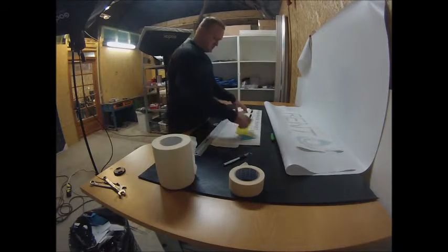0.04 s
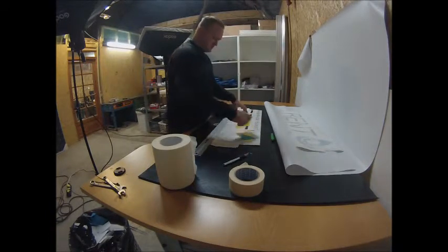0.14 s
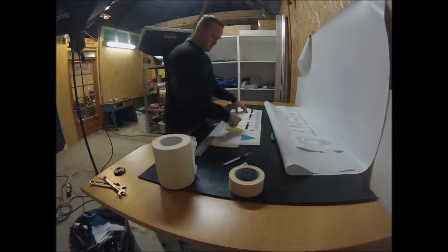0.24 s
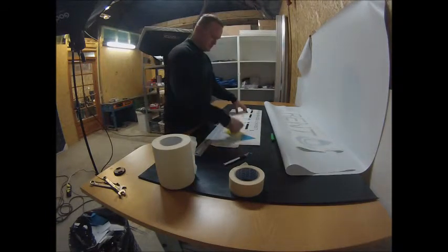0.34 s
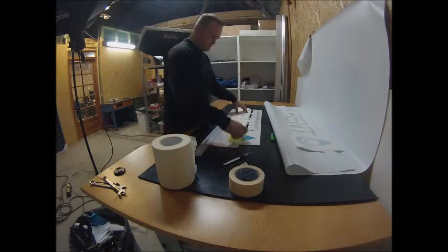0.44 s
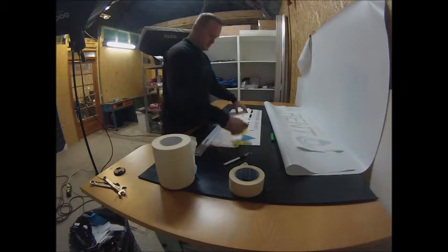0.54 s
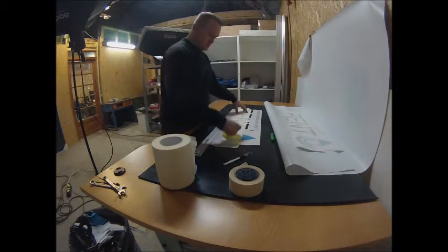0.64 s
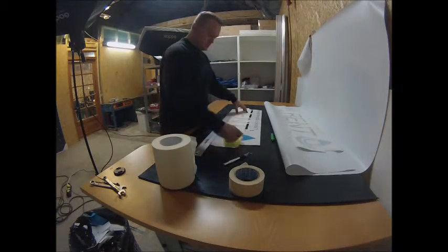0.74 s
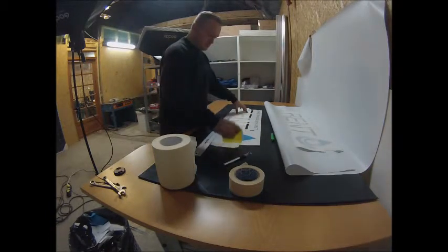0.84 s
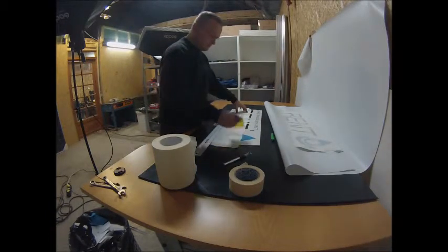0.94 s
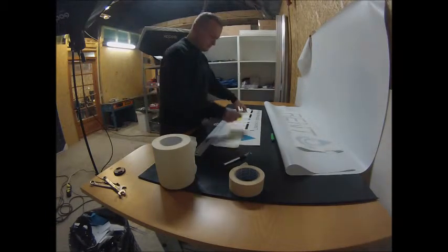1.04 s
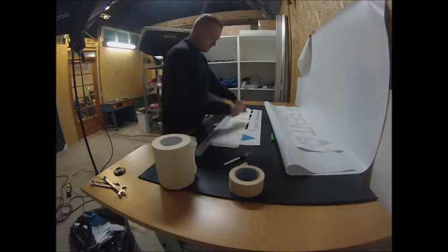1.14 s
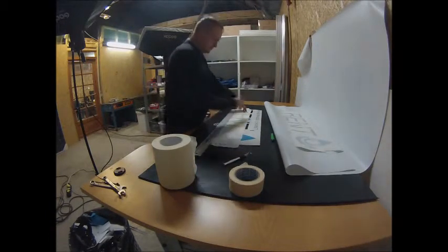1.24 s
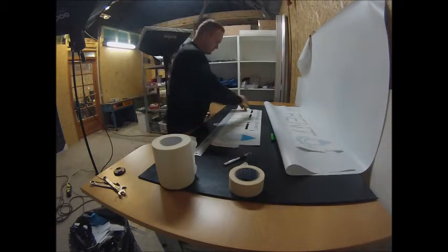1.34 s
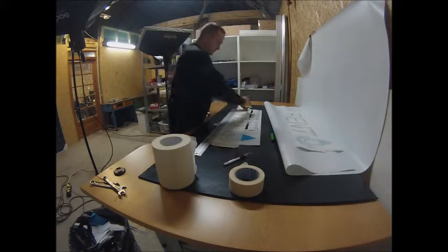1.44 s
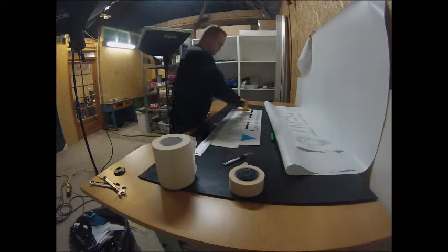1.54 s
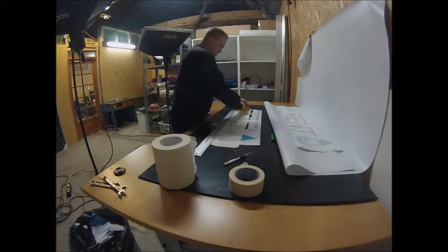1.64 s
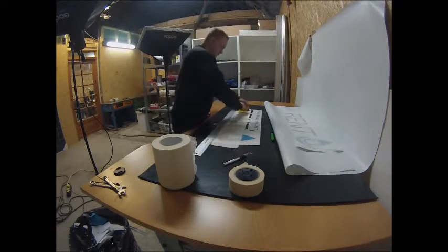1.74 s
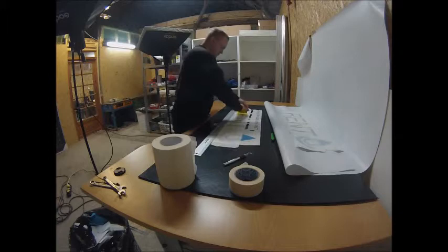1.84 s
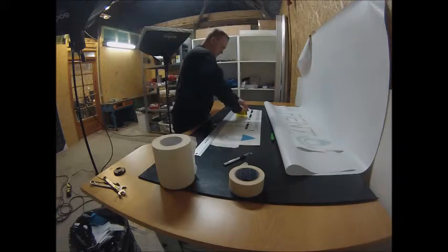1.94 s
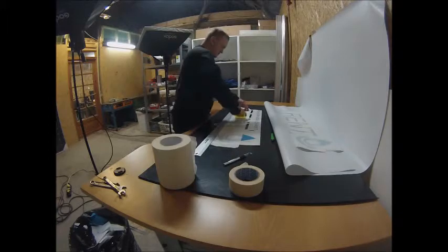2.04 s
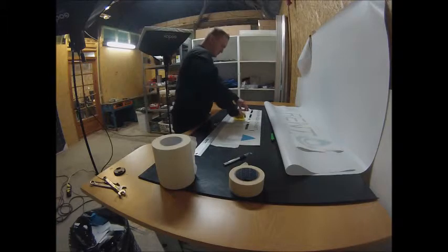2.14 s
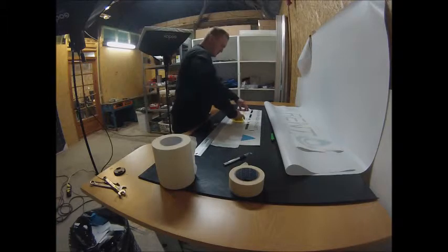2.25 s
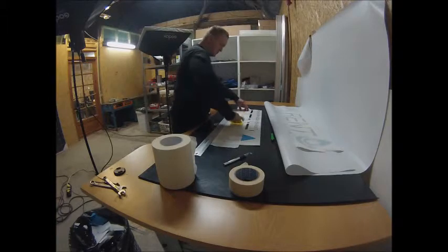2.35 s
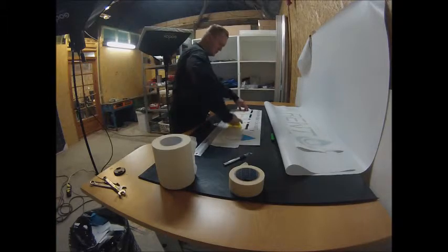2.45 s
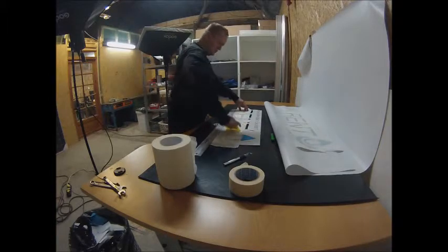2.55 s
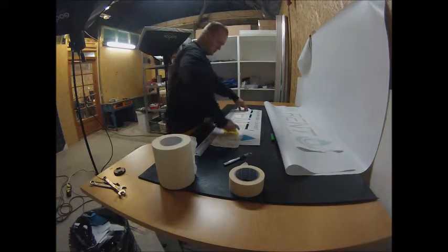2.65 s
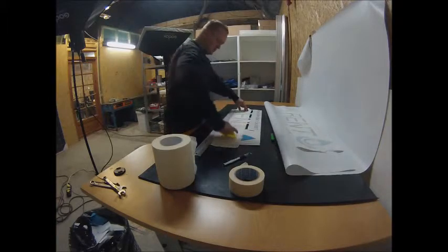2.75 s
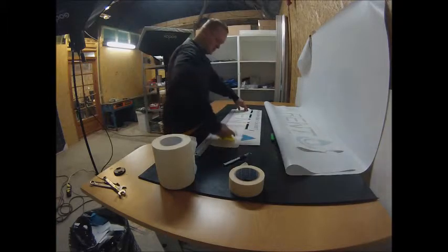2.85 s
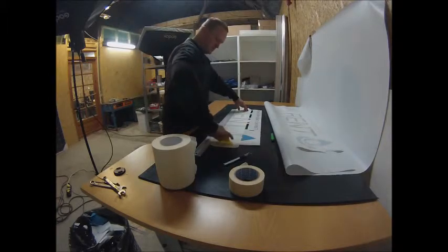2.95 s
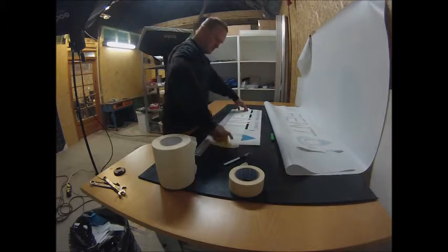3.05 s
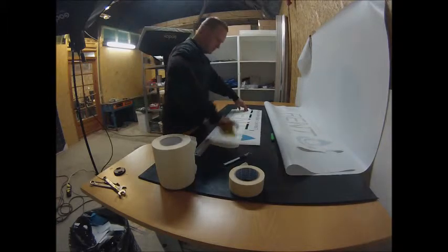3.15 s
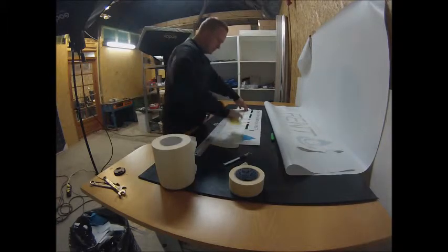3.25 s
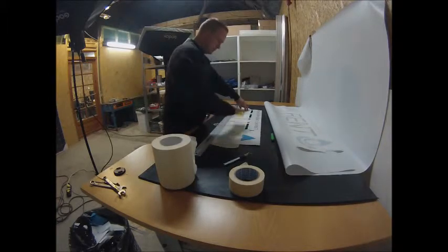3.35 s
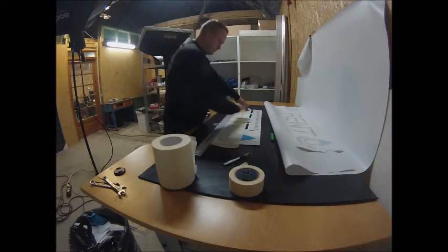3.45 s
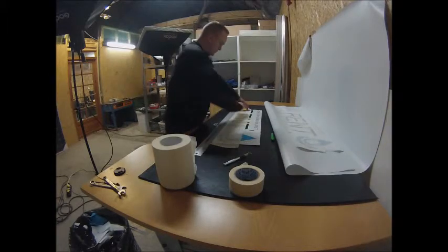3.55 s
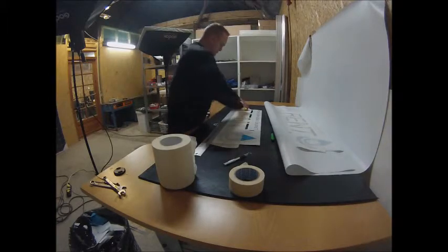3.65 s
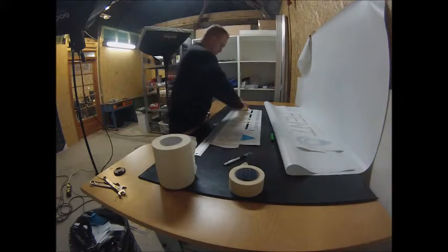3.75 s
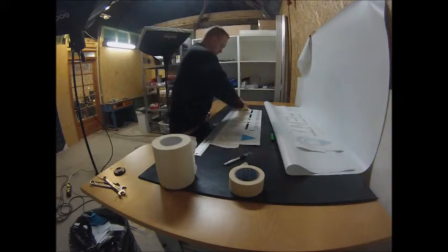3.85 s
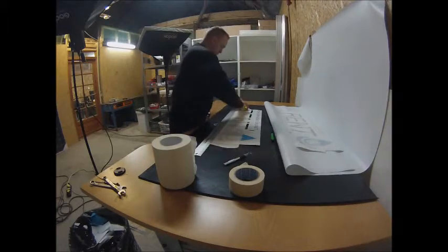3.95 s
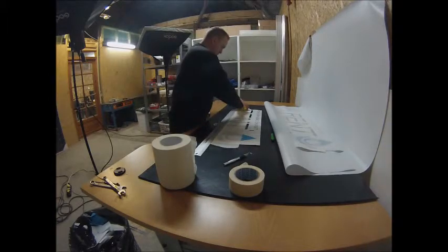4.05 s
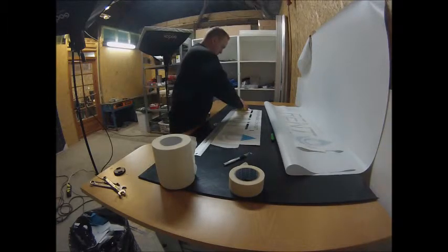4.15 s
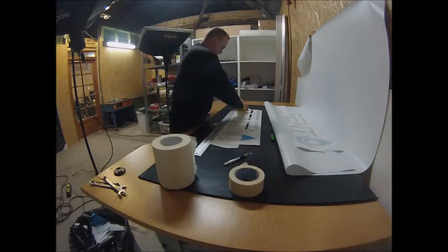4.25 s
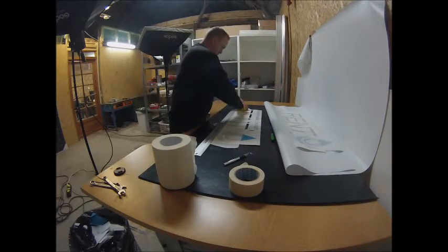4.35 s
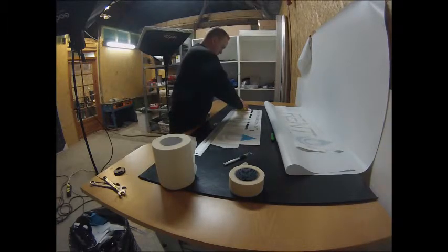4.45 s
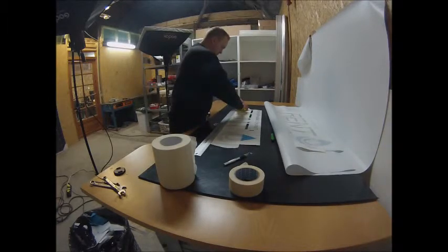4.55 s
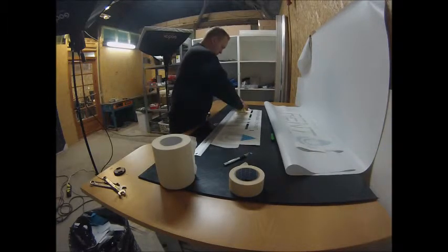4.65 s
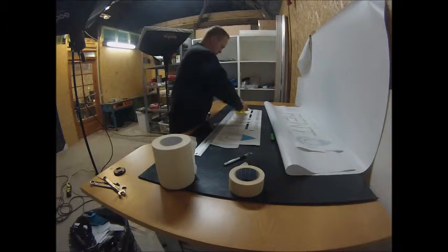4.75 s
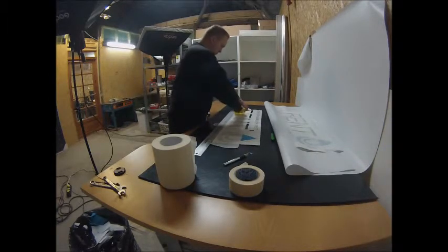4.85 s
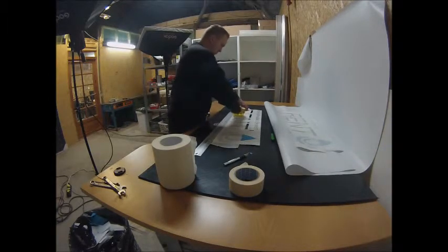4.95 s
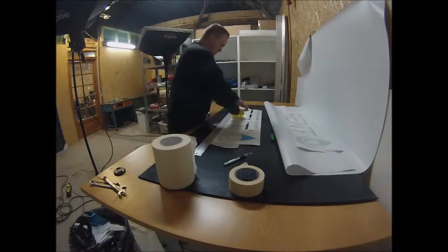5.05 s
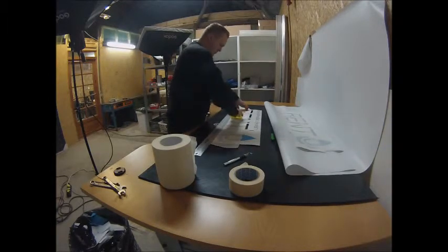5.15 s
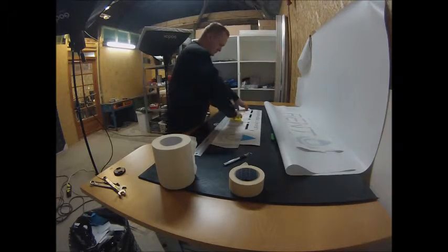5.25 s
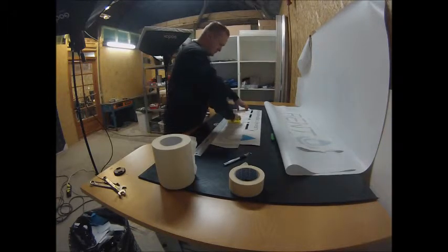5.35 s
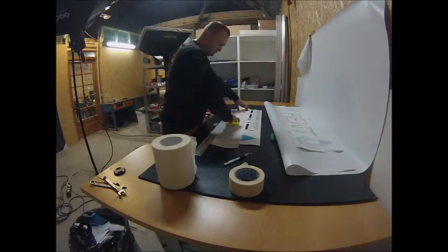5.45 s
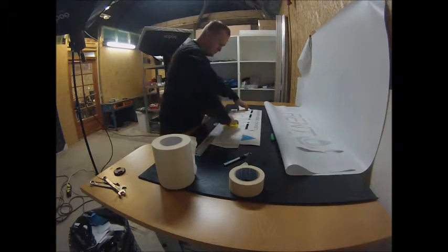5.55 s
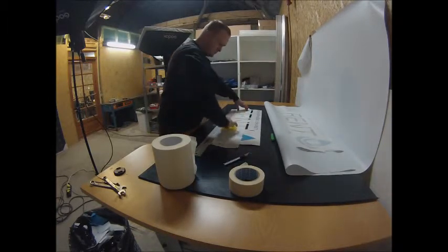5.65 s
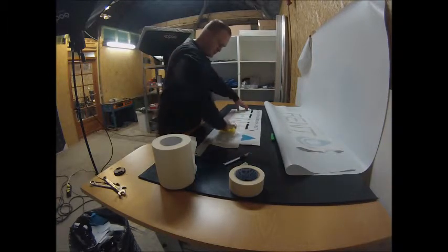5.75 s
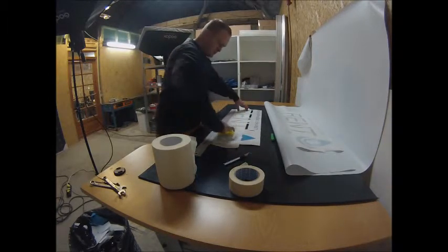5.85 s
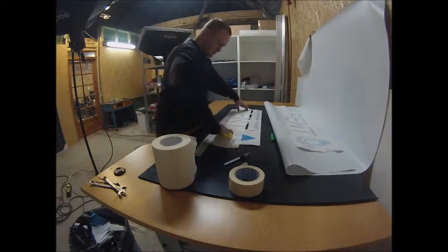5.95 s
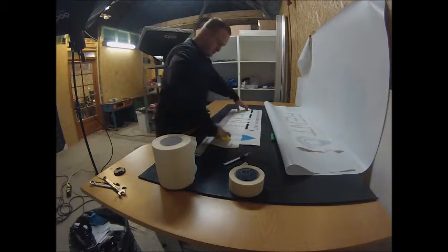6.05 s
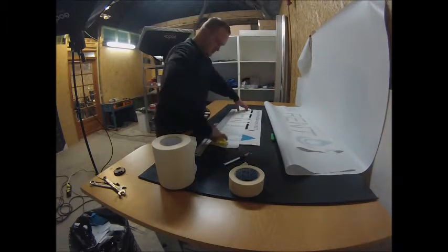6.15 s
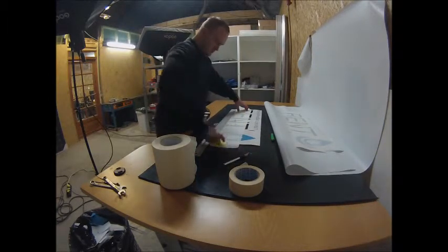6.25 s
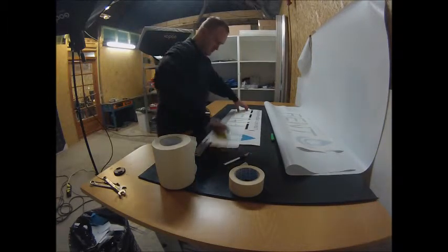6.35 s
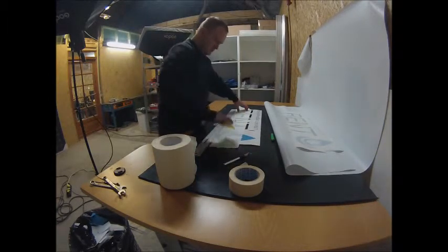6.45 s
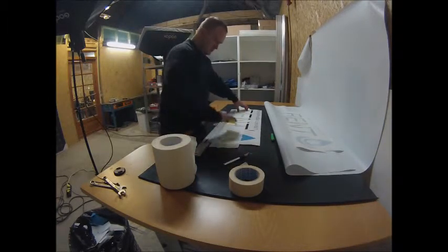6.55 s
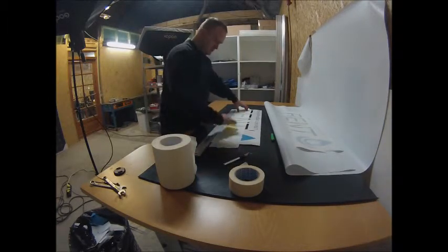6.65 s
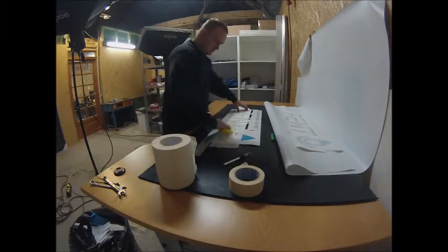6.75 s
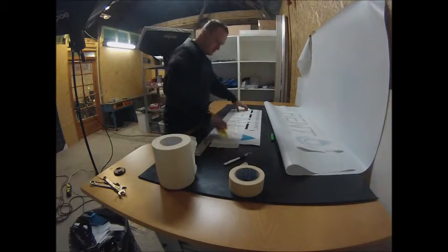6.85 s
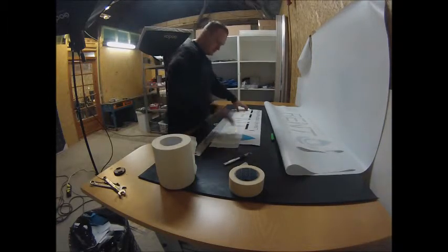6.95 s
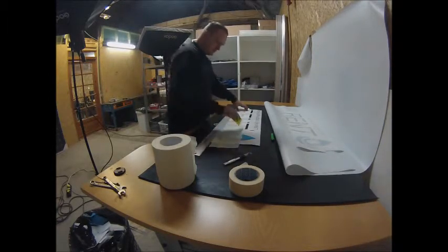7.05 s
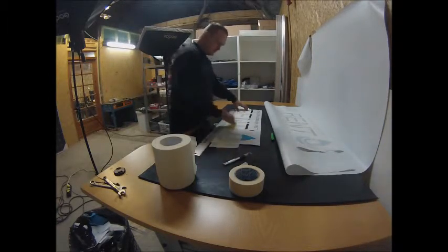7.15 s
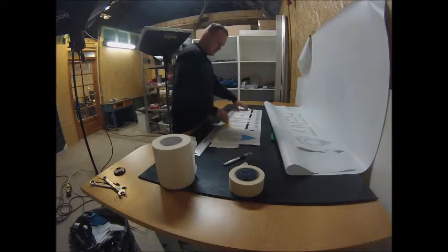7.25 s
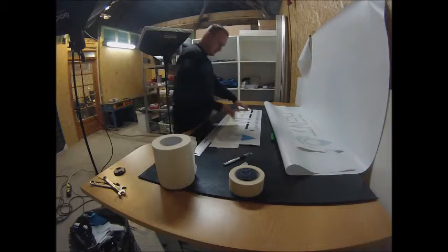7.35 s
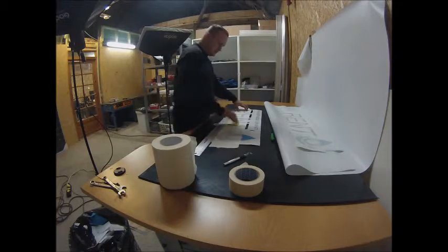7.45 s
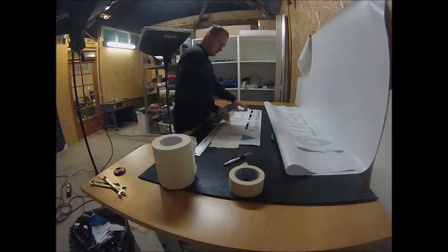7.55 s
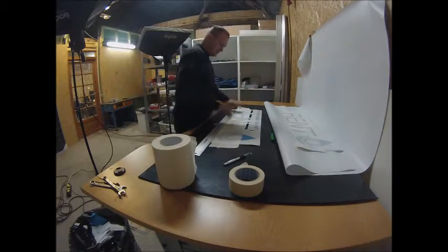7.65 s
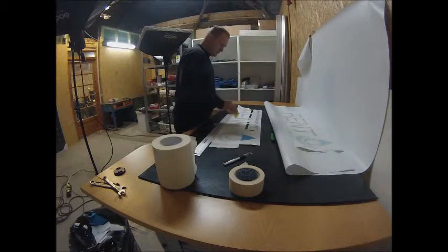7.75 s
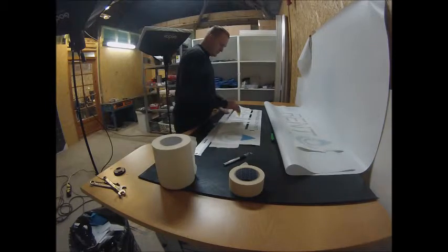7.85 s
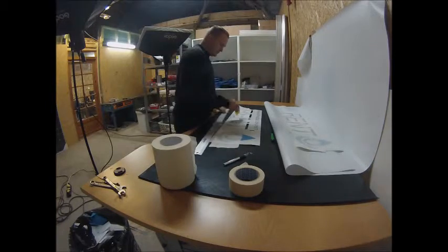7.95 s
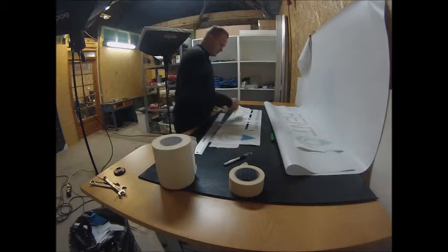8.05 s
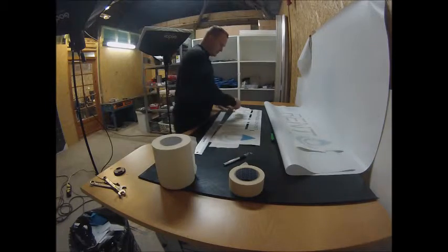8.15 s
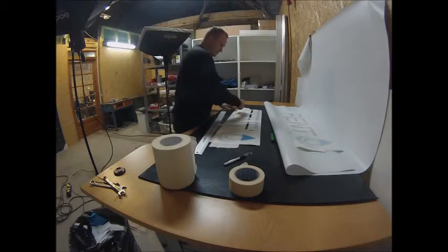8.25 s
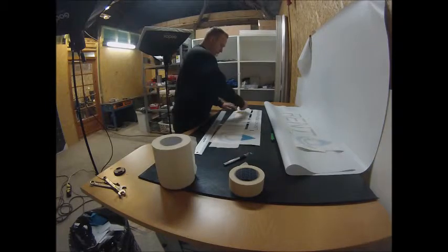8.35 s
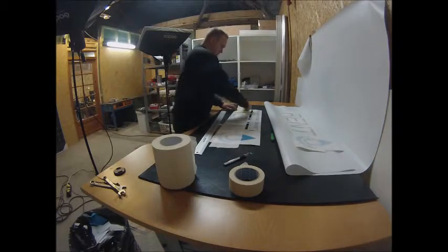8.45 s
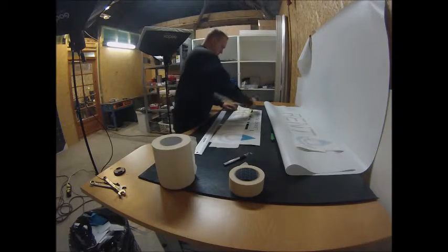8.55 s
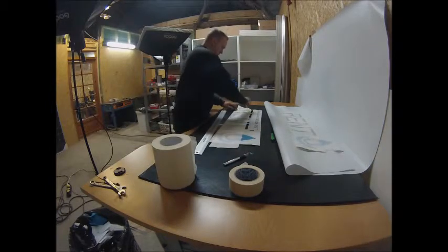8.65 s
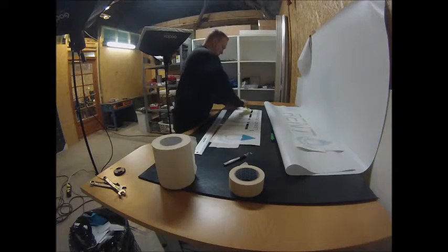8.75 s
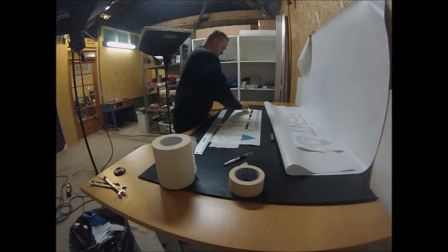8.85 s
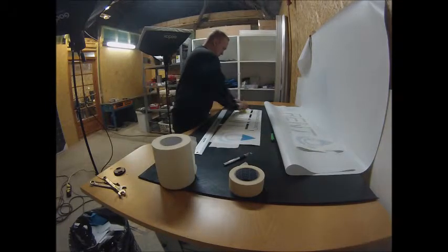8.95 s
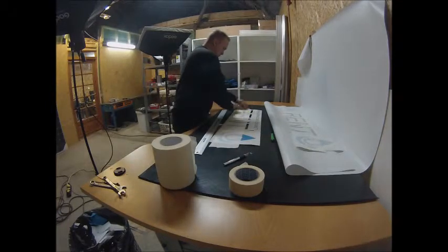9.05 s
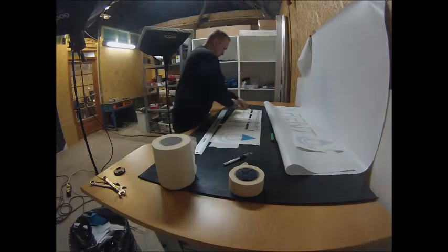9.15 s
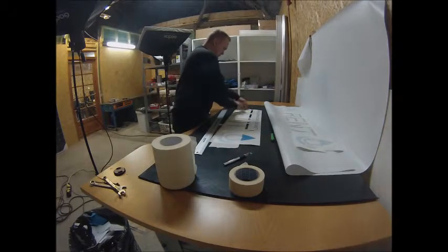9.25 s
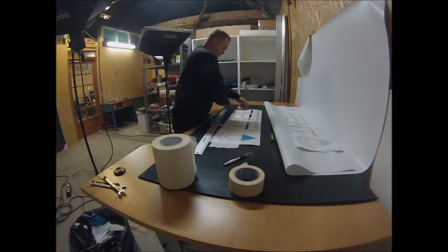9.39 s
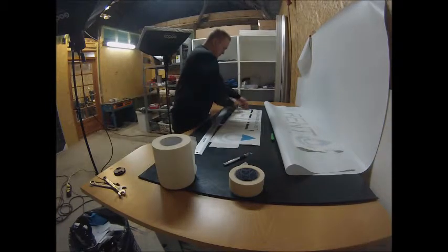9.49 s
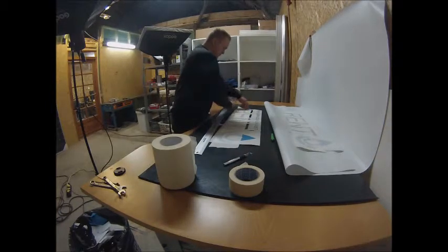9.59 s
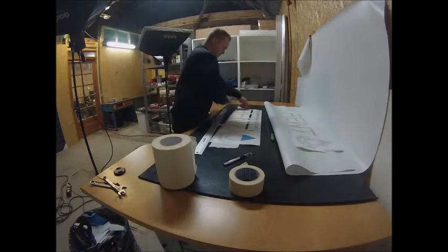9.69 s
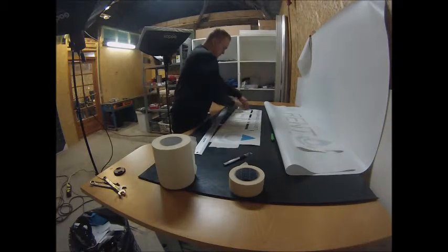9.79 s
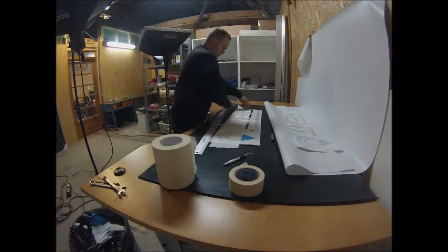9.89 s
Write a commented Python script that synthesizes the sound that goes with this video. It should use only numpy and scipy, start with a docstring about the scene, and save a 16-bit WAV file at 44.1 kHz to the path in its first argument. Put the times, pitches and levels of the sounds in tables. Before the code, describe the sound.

Quick swishing scrapes and longer, duller rubs of a squeegee on vinyl sheet, with small taps and clicks over faint ventilation hum.

```python
"""Quick scraping strokes sweep over vinyl: a plastic squeegee on a workbench in a small workshop.
Stick-slip friction excites bench, sheet and blade, brightly in the sweeps and duller in two slow pushes.
The blade taps down, snags on the sheet's edges and judders; the bench thumps when leaned on.
The blade's sounds reverberate in the room, over a faint hum of ventilation, all at one microphone."""
import sys
import numpy as np
from scipy import signal
from scipy.fft import rfft, irfft, next_fast_len
from scipy.io import wavfile

SR = 44100
rng = np.random.default_rng(int(sys.argv[2]) if len(sys.argv) > 2 else 0)


def dump_mix(stems):
    """Bounce the given channels to the path in sys.argv[1] as a 16-bit WAV at rate SR."""
    frames = np.atleast_2d(stems).T  # one column per channel
    limited = np.clip(frames, -1, 1)  # hard clip at full scale
    pcm = np.round(limited * 32767).astype(np.int16)
    wavfile.write(sys.argv[1], SR, pcm)


N = 437472


def sweeps():
    """Stick-slip friction in fast strokes: dense slips make a bright scrape."""
    # (start [s], speeding up [s], slowing [s], scrape level [dB], drumming [dB re scrape],
    #  hiss [dB re scrape], position [0 far, 1 near])
    quick_strokes = [ (-0.07, 0.19, 0.017, -35, -2.5, -5, 0.91), (.345, .16, 0.038, -33.5, -4, -6, 1),
                     (.724, 0.11, 0.039, -32, -4.5, -6.5, 1), (6.742, 0.11, 0.053, -35.5, -7.5, -7.5, 0.73),
                     (7.21, 0.035, 0.11, -43, -5, -13.5, 0.21), (7.515, 0.06, 0.076, -43, -2.5, -13, .2),
                     (7.855, .025, .11, -57.5, 10, -7.5, 0.089), (8.0, 0.021, 0.1, -61, 13, -12, 0.058),
                     (8.495, 0.068, .037, -40, 1, -7.5, 0.49), (9.0, 0.11, 0.07, -42, -4, -10.5, 0.037),
                     (9.322, 0.089, 0.044, -40, -0.5, -9, 0.22),
                     (9.608, 0.069, 0.038, -37, -3, -11.5, 0.42), (9.88, .08, .03, -41.5, 5, -13, 0.28)]
    # friction spectrum: (frequency [Hz], level [dB])
    spectrum = [(60, -36), (200, -16.5), (400, -7.5), (650, -6), (1000, 2.5), (1500, -3.5), (2200, -3.5),
                (3500, 0), (5000, -2.5), (7500, -11.5), (10000, -18.5), (12500, -24), (13800, -34),
                (15500, -35)]
    gains = strokes(quick_strokes)
    return sliding(gains, lambda: slips(per_s=9000, spread=0.73, smooth=0.76), spectrum, chatter_db=1.1)


def rubs():
    """Stick-slip friction in slow pushes and light wipes: sparser slips, a duller scrape."""
    # light rubs at the far end: columns as for quick_strokes in sweeps()
    wipes = [ (4.155, 0.038, 0.031, -52.5, 2.5, -26, 0), (4.265, 0.053, 0.044, -56.5, -1, -18, .05),
             (4.425, 0.037, 0.025, -50.5, 2.5, -17, 0.11)]
    # friction spectrum: (frequency [Hz], level [dB])
    spectrum = [(60, -46), (200, -9.5), (450, -5.5), (700, -3), (1000, 3), (1500, -6.5), (2200, -5),
                (3300, -5), (5000, -8), (7500, -13.5), (10000, -19.5), (12500, -26), (13800, -34),
                (15500, -36)]
    gains = pushes() + strokes(wipes)
    return sliding(gains, lambda: slips(per_s=4500, spread=0.63, smooth=0.97), spectrum, chatter_db=1.15)


def strokes(rows):
    """Friction noise grows with sliding speed: hiss follows the hand most, drumming least."""
    start_db, end_db = -15.5, -6  # scrape re full speed
    drum_slope, hiss_slope = 0.68, 1.37  # dB per dB of scrape
    gains = np.zeros((2, 3, N))
    for start, swell, ease, db, drum_db, hiss_db, near in rows:
        end = start + swell + ease
        span = around(start, end)
        t = span / SR
        speed_db = start_db * np.clip((start + swell - t) / swell, 0, 1) ** 2
        speed_db += end_db * np.clip((t - start - swell) / ease, 0, 1) ** 2
        bands_db = [speed_db, drum_db + drum_slope * speed_db, hiss_db + hiss_slope * speed_db]
        gains[..., span] += blade_gains(t, start, end, db + np.array(bands_db), near)
    return gains


def pushes():
    """Coupling depends on position: the bench drums more as a push travels from far end to near."""
    # one curve a push: (time [s], scrape level [dB], relative treble level [dB])
    curves = [
        [(1.73, -60, -12), (1.76, -44, -14), (1.85, -38.5, -9.5), (1.96, -38.5, -9.5), (2.124, -42, -11.5),
         (2.558, -40.5, -8.5), (2.922, -42.5, -11.5), (3.106, -37.5, -11), (3.135, -40.5, -14)],
        [(4.55, -63, -9), (4.604, -48.5, -19), (4.77, -44, -13.5), (5.272, -43.5, -12), (5.276, -41.5, -12.5),
         (5.508, -43.5, -7.5), (6.074, -43.5, -12), (6.27, -40, -8.5), (6.352, -35.5, -13)],
    ]
    crossing_s, hiss_trim_db = 0.96, -1.5
    far_drum_db, near_drum_db = -10, -4.5  # re scrape
    gains = np.zeros((2, 3, N))
    for curve in curves:
        times, scrape_db, treble_db = np.transpose(curve)
        span = around(times[0], times[-1])
        t = span / SR
        near = np.clip((t - times[0]) / crossing_s, 0, 1)
        db = np.interp(t, times, scrape_db)
        drum_db = db + far_drum_db + (near_drum_db - far_drum_db) * near
        hiss_db = db + hiss_trim_db + np.interp(t, times, treble_db)
        gains[..., span] += blade_gains(t, times[0], times[-1], [db, drum_db, hiss_db], near)
    return gains


def blade_gains(t, start, end, bands_db, near):
    """During contact, the power of scrape, drumming and hiss divides between the bench's two ends."""
    bite_s, lift_s = 0.0024, 0.0051  # time constants
    contact = np.exp(-np.maximum(start - t, 0) / bite_s - np.maximum(t - end, 0) / lift_s)
    near = np.clip(near + np.zeros_like(t), 0, 1)
    return np.sqrt([1 - near, near])[:, None] * contact * amp(bands_db)


def slips(per_s, spread, smooth):
    """Shot noise: tiny stick-slip releases of uneven size, on top of smooth sliding noise."""
    sizes = np.minimum(np.exp(spread * rng.standard_normal(N)), 3)
    releases = (rng.random(N) < per_s / SR) * rng.choice([-1, 1], N) * sizes
    return unit(unit(releases) + smooth * rng.standard_normal(N))


def sliding(gains, excite, spectrum, chatter_db):
    """Modal response: the chattering blade drives different resonances at each end of the bench."""
    # resonances of bench, sheet and blade: (frequency [Hz], width [Hz], lift [dB])
    far_modes = [(1014, 280, 9.5), (1354, 56, 10.5), (1393, 90, -12), (1535, 65, 10.5), (1840, 330, 14.5),
                 (2240, 320, -5), (2460, 100, 5), (3070, 130, 9), (3450, 120, 2), (3760, 220, -6.5),
                 (4860, 150, 5), (5330, 190, 5)]
    near_modes = [(422, 280, -1), (689, 210, 5.5), (964, 180, 5), (1283, 82, 5.5), (1610, 200, 5),
                  (1895, 215, 9.5), (2260, 270, -7), (2500, 320, 4), (3164, 490, 5), (3527, 430, 7),
                  (4173, 155, 7), (5230, 380, 5), (6770, 880, 4.5), (8100, 190, 7)]
    chatter = amp(chatter_db * wobble(110))
    far = friction(gains[0], excite(), spectrum, far_modes, chatter)
    near = friction(gains[1], excite(), spectrum, near_modes, chatter)
    return far + near


def friction(gains, excitation, spectrum, modes, chatter):
    """Forced vibration: slips ring the bench (low), blade and sheet (middle), and hiss at the contact."""
    size = next_fast_len(N + 8192, real=True)
    hz = np.fft.rfftfreq(size, 1 / SR)
    vibration = rfft(excitation, size) * amp(along(spectrum, hz) + lifts(modes, hz))
    low, body = below(hz, 1305), below(hz, 5390)
    bands = (body - low, low, 1 - body)
    scrape, drum, hiss = (unit(irfft(vibration * band, size)[:N] * chatter) for band in bands)
    return gains[0] * scrape + gains[1] * drum + gains[2] * hiss


def taps():
    """Impact excitation: the springy blade lands on the padded bench, and a quieter ring follows a few
    milliseconds later."""
    # (time [s], level [dB], relative thud level [dB], relative crack level [dB])
    landings = [(.325, -27.5, 1, -0.5), (.563, -31.5, -6, -19), (.703, -22, -3, -3),
                (1.69, -32.5, -9, -1.5), (4.008, -46, -5, -12), (4.11, -40.5, -8, -9),
                (6.742, -28.5, -2, -0.5), (7.194, -37, -3, -5), (7.207, -22.5, -10, -10),
                (7.509, -19, -9, -10), (7.872, -36, 3, -5), (8.015, -36.5, -4, -3), (8.459, -36, -2, 1.5),
                (8.86, -41.5, 0, -4), (9.32, -19.5, -2, -5.5), (9.337, -27.5, -3.5, -6),
                (9.589, -26, -0.5, -1), (9.87, -21.5, -4, -8.5)]
    # impact spectra: (frequency [Hz], level [dB])
    crack_spectrum = [(300, -12), (1500, 5), (3200, 5), (6000, -5.5), (9000, -12), (15000, -31)]
    thud_spectrum = [(60, -17), (240, -2.5), (380, 5.0), (480, 1), (700, 2), (1400, -53)]
    out, t = np.zeros(N), np.arange(SR // 8) / SR
    for start, db, thud_db, crack_db in landings:
        thud = amp(thud_db - 7.5) * burst(t, thud_spectrum, t60=0.086)
        crack = amp(crack_db - 6.0) * burst(t, crack_spectrum, t60=0.054)
        crack *= 1 - np.exp(-t / 0.0029)  # the edge settles flat
        later_ring = bench_ring(t, damping=1.2)
        delay = round(rng.uniform(0.0043, 0.0089) * SR)
        later_ring = np.pad(later_ring, (delay, 0))[:len(t)]
        add(out, start, amp(db - 0.5) * (bench_ring(t, damping=1.7) + 0.45 * later_ring + thud + crack))
    return out


def snags():
    """Transient excitation: the blade catches an edge, and the sharper the edge the brighter the snap."""
    # (time [s], level [dB], sharpness [dB])
    catches = [(.865, -21, 5.5), (1.984, -40, -10), (2.105, -26.5, -14), (2.495, -33, 14),
               (2.545, -27, -12), (2.972, -20.5, -2), (3.035, -21.5, 0), (3.062, -20.5, -15),
               (3.081, -37, 0), (3.093, -25.5, 0), (5.297, -23.5, -10), (5.68, -28, -9), (5.82, -36, -8),
               (6.346, -35, -5)]
    out, t = np.zeros(N), np.arange(SR // 8) / SR
    for start, db, sharp_db in catches:
        spectrum = [(500, -12), (1700, 17), (3300, 6), (8000, sharp_db - 8), (15000, sharp_db - 24)]
        snap = amp(sharp_db) * burst(t, spectrum, t60=0.016)
        add(out, start, amp(db) * (bench_ring(t, damping=2.2) + snap / 2))
    return filtered(out, lambda hz: 1 - below(hz, 610, order=4))


def bench_ring(t, damping):
    """Free vibration: the struck bench's modes decay from random strengths and phases; peak 1."""
    # (frequency [Hz], level [dB], t60 at damping 1 [s])
    modes = [(644, -4, 0.055), (735, -3, 0.053), (925, -4, 0.049), (1056, 0.5, 0.039), (1295, -10, 0.065),
             (1562, -2.5, 0.018), (1940, -7, 0.024)]
    wave = np.zeros(len(t))
    for hz, db, t60 in modes:
        decay = amp(db + rng.normal(0, 0.62) - 60 * damping * t / t60)
        wave += decay * np.sin(2 * np.pi * (hz * t + rng.random()))
    wave *= 1 - np.exp(-t / 0.00044)
    return wave / np.abs(wave).max()


def judders():
    """Self-excited oscillation: stick and slip lock briefly onto one resonance in a rough grunt."""
    # (time [s], level [dB], duration [s], frequency [Hz])
    grunts = [(0, -27.5, 0.009, 937), (0.109, -31, 0.015, 966), (0.504, -32.5, 0.016, 1007),
              (0.826, -25, 0.025, 990), (0.852, -26.5, 0.013, 994), (6.33, -38.5, 0.024, 3370),
              (8.013, -38.5, 0.01, 1040), (8.458, -34.5, 0.01, 1050), (8.531, -36, 0.02, 1028),
              (8.553, -24, 0.009, 992), (8.57, -27, 0.0084, 942), (9.354, -28.5, 0.012, 996)]
    out = np.zeros(N)
    for start, db, length, hz in grunts:
        t = np.arange(round(length * SR)) / SR
        phase = 2 * np.pi * hz * t + np.cumsum(rng.normal(0, 0.033, len(t)))
        swell = np.sqrt(np.abs(np.sin(np.pi * t / length)))
        tone = np.sin(phase) + 0.056 * np.sin(2 * phase) + 0.062 * np.sin(3 * phase)
        add(out, start, amp(db) * swell * tone)
    return out


def bench_thumps():
    """Damped low modes: shifting weight thumps the bench and briefly raises its faint rumble."""
    # (time [s], level [dB], frequency [Hz])
    weight_shifts = [(0.703, -50.5, 191), (1.438, -52, 134), (7.213, -45, 93.5), (7.52, -44, 109.5),
                     (7.82, -47, 121), (8.839, -50.5, 131), (9.011, -36.5, 139.6), (9.049, -46, 102),
                     (9.324, -46, 88), (9.596, -50, 95), (9.873, -46, 89.5)]
    # (frequency [Hz], level [dB])
    rumble_spectrum = [(15, -39), (55, 3.5), (120, -8.5), (250, -20.5), (600, -33), (2000, -100)]
    modes = [(1, 1), (1.585, 0.5), (0.75, 0.74)]  # (frequency ratio, gain)
    thump_t60_s, rumble_t60_s = 0.24, 1.4
    rumble_re_thump_db, rest_db = -15.5, -64.5
    thumps, shaking, t = np.zeros(N), np.zeros(N), np.arange(SR) / SR
    for start, db, hz in weight_shifts:
        swing = sum(gain * np.sin(2 * np.pi * ratio * hz * t) for ratio, gain in modes)
        onset = 1 - np.exp(-t / 0.0035)
        add(thumps, start, amp(db - 60 * t / thump_t60_s) * onset * swing)
        add(shaking, start, amp(db + rumble_re_thump_db - 60 * t / rumble_t60_s) * onset)
    return thumps + (amp(rest_db) + shaking) * noise(N, rumble_spectrum)


def workshop(x, wet_db, size=16384):
    """Time-varying convolution: each overlapping stretch of the moving source has its own echo paths."""
    out, padded = np.zeros(N + size), np.pad(x, size)
    window = np.sin(np.pi * np.arange(size) / size) ** 2
    for start in range(size // 2, N + size, size // 2):
        add(out, start / SR, signal.fftconvolve(padded[start:start + size] * window, echo(wet_db)))
    return out[size:]


def echo(wet_db):
    """Room impulse response: direct sound, early reflections and a diffuse tail, at unit energy."""
    # near surfaces: (delay [s], gain [re direct sound])
    reflections = [(.0042, 0.22), (.0071, 0.053), (0.0099, 0.21), (0.017, 0.099)]
    # (frequency [Hz], t60 [s])
    reverb_times = [(100, 0.82), (700, 0.37), (1000, 0.41), (1500, 0.46), (3100, 0.44), (4200, 0.32),
                    (5300, 0.46), (6500, 0.29), (14000, 0.38)]
    hz, t, spectra = signal.stft(rng.standard_normal(SR // 2), SR, nperseg=256)
    decay = amp(-60 * t / along(reverb_times, hz)[:, None])
    onset = 1 - np.exp(-t / 0.0017)
    _, tail = signal.istft(spectra * decay * onset, SR, nperseg=256)
    response = amp(wet_db) * tail / np.linalg.norm(tail)
    response[0] += 1
    for delay, gain in reflections:
        response[round(delay * rng.uniform(0.85, 1.15) * SR)] += gain
    return response / np.linalg.norm(response)


def room_tone():
    """Broadband air noise, wavering slightly, with spectral peaks that make a faint drone."""
    # (frequency [Hz], level [dB])
    air_spectrum = [(12, -41), (20, 1.5), (54, -3.5), (126, -3.5), (161, -8.5), (191, -8.5), (306, -8.5),
                    (427, -10), (519, -17), (725, -10), (881, -12), (958, -18), (1500, -18.5), (5230, -27),
                    (15500, -42.5)]
    # ventilation: (frequency [Hz], width [Hz], lift [dB])
    drone = [(62.5, 5.6, 6), (115, 17, -1), (563, 62, 10), (726, 16, 11.5), (1047, 180, 10)]
    air = noise(N, air_spectrum, drone)
    return amp(-56.5 + 0.46 * wobble(4.6)) * air


def noise(length, spectrum, modes=()):
    """White noise shaped by a spectrum and any resonances, at rms 1."""
    white = rng.standard_normal(length)
    return unit(filtered(white, lambda hz: amp(along(spectrum, hz) + lifts(modes, hz))))


def burst(t, spectrum, t60):
    """Coloured noise in exponential decay."""
    return noise(len(t), spectrum) * amp(-60 * t / t60)


def amp(db):
    """Decibels to amplitude gain."""
    return 10 ** (np.asarray(db) / 20)


def unit(x):
    """Normalise to rms 1."""
    return x / np.sqrt(np.mean(x ** 2) + 1e-20)


def along(points, hz):
    """Interpolate (frequency [Hz], value) points on a log axis."""
    frequencies, values = np.transpose(points)
    return np.interp(np.log(hz + 1), np.log(frequencies + 1), values)


def lifts(modes, hz):
    """The dB that bell-shaped resonance curves add at each frequency."""
    return sum(db / (1 + (2 * (hz - centre) / width) ** 2) for centre, width, db in modes)


def below(hz, edge_hz, order=8):
    """Magnitude response of a low-pass."""
    return 1 / np.sqrt(1 + (hz / edge_hz) ** (2 * order))


def wobble(rate):
    """Random modulation, rate knots a second."""
    knots = rng.standard_normal(int(N * rate / SR) + 2)
    return np.interp(np.arange(N) * rate / SR, np.arange(len(knots)), knots)


def filtered(x, response):
    """Linear filtering: multiply the spectrum of x by a frequency response."""
    size = next_fast_len(x.shape[-1] + 8192, real=True)
    return irfft(rfft(x, size) * response(np.fft.rfftfreq(size, 1 / SR)), size)[..., :x.shape[-1]]


def add(track, start_s, sound):
    """Superpose a sound on the track."""
    part = track[round(start_s * SR):][:len(sound)]
    part += sound[:len(part)]


def around(start, end):
    """The sample indices of a stroke, with a 0.1 s margin."""
    return np.arange(max(round(start * SR) - SR // 10, 0), min(round(end * SR) + SR // 10, N))


def scene():
    """Superposition of blade, bench and air at one microphone, which feeds both channels."""
    blade = sweeps() + rubs() + taps() + snags() + judders()
    mono = amp(-0.66) * workshop(blade, wet_db=-7.5) + bench_thumps() + room_tone()
    return np.array([mono, mono])


def record(dry):
    """Band limiting: an ideal low-pass removes the highest treble."""
    return filtered(dry, lambda hz: hz < 15400)


dry = scene()
out = record(dry)
dump_mix(out)
```